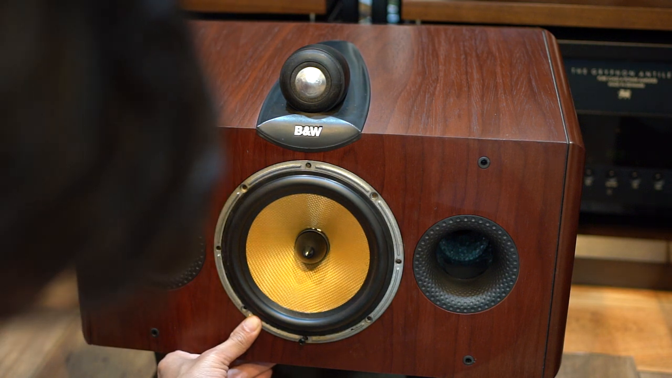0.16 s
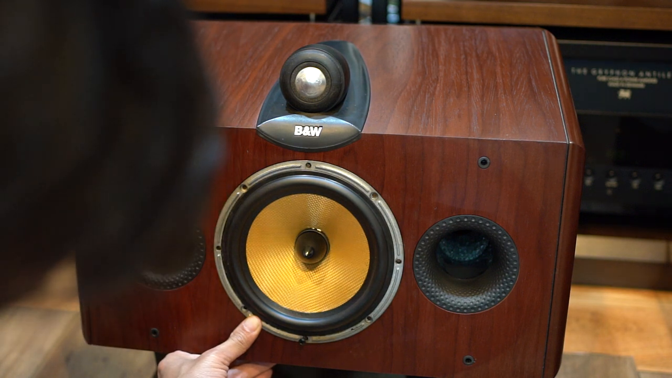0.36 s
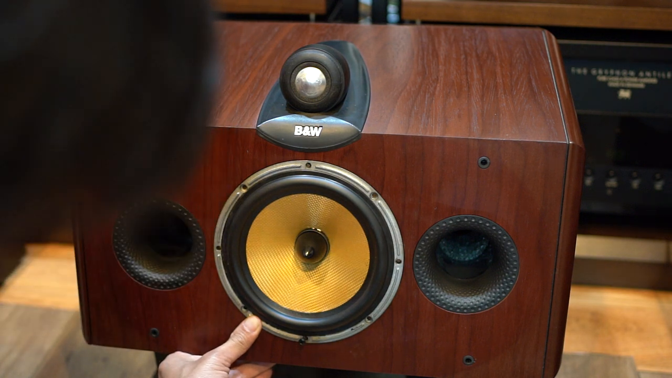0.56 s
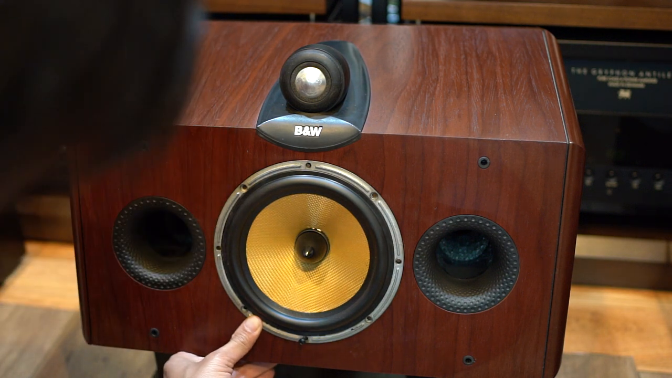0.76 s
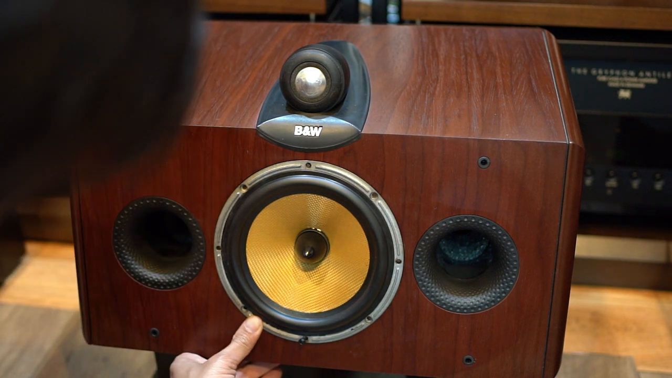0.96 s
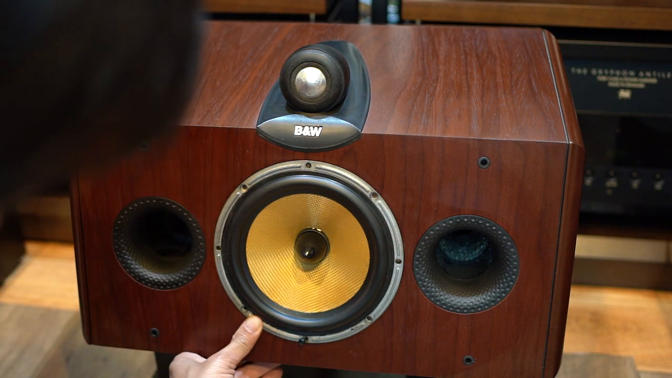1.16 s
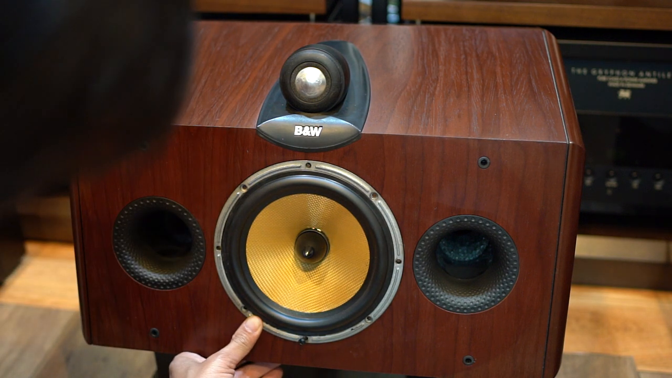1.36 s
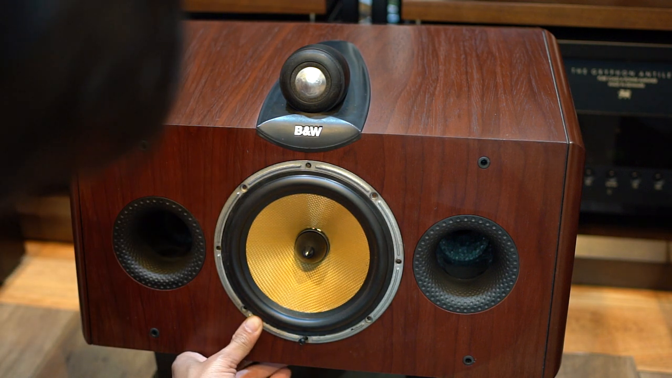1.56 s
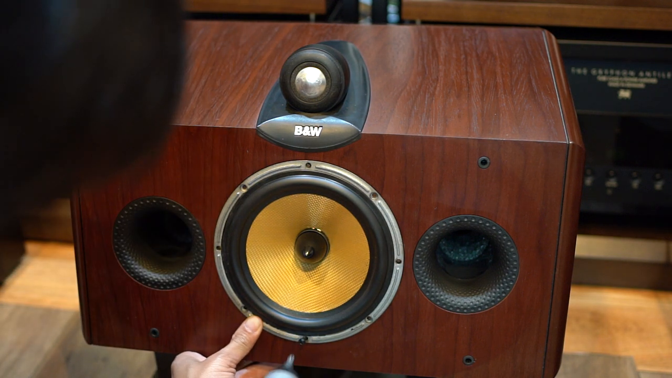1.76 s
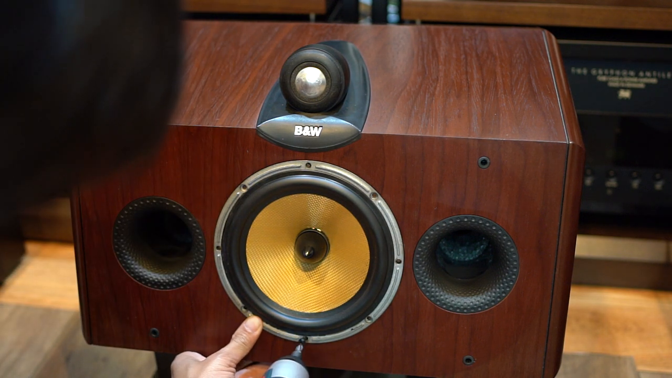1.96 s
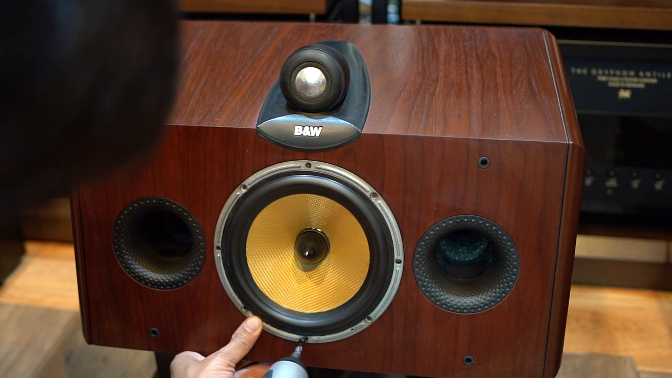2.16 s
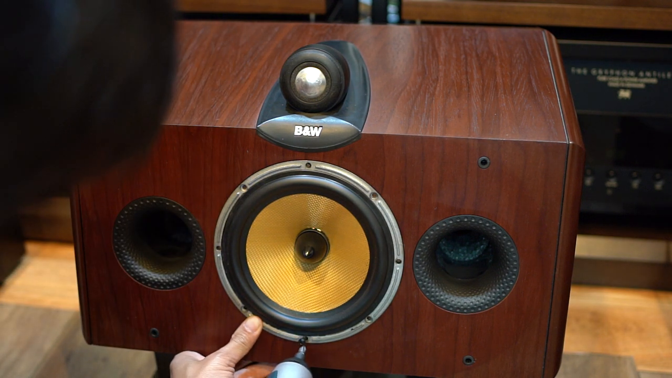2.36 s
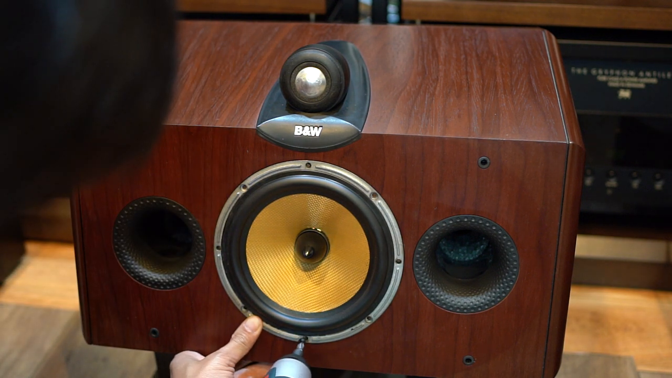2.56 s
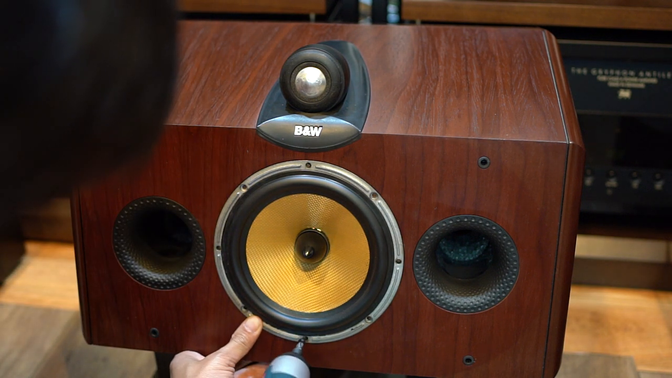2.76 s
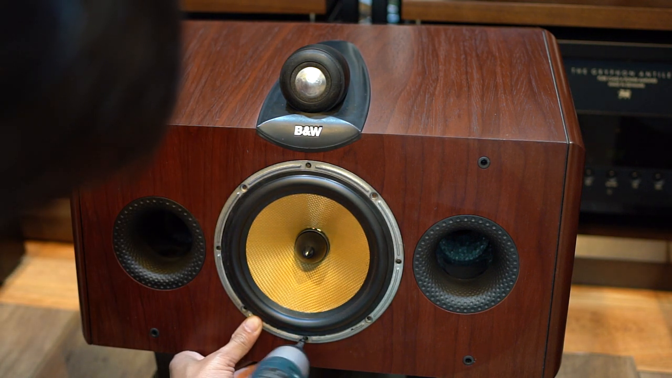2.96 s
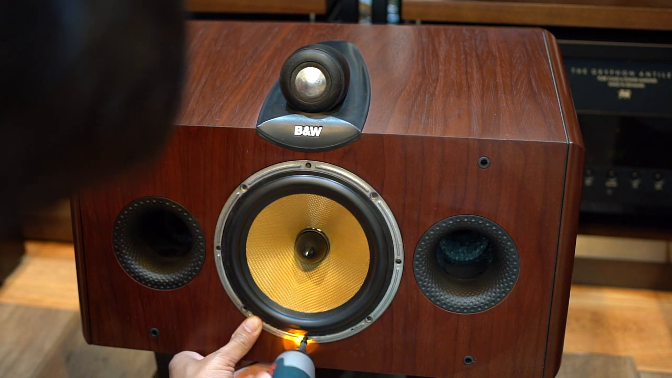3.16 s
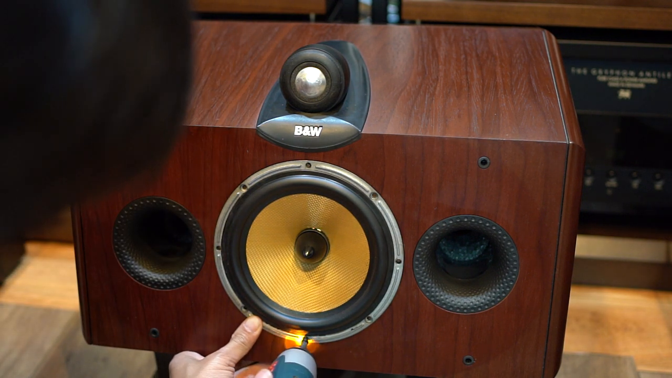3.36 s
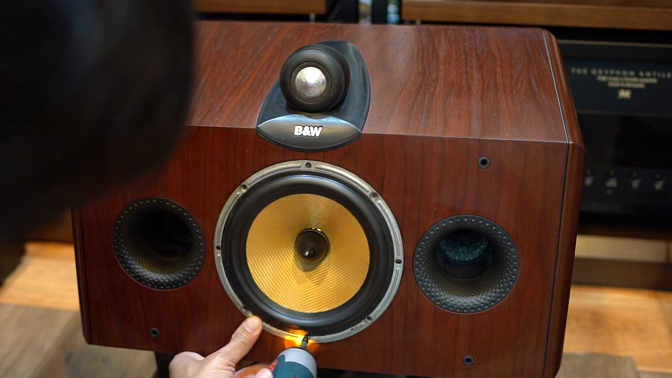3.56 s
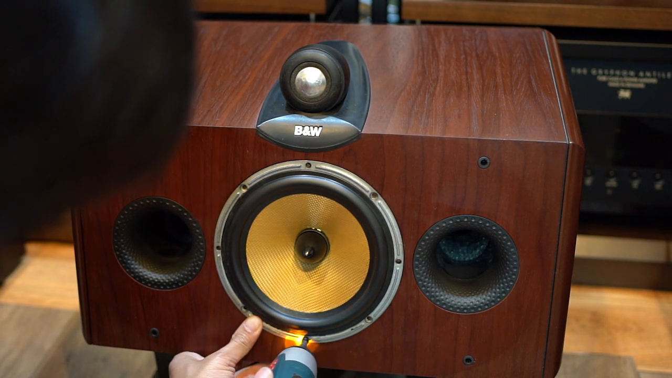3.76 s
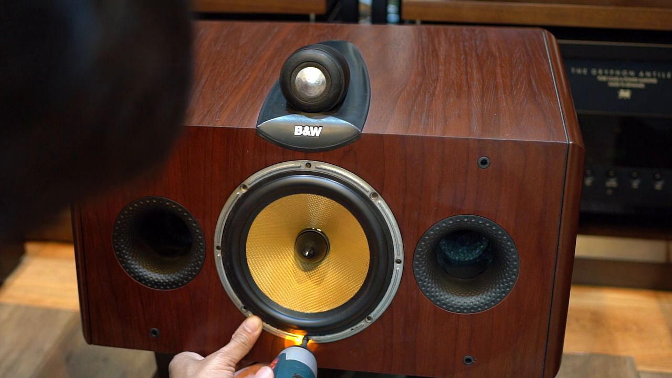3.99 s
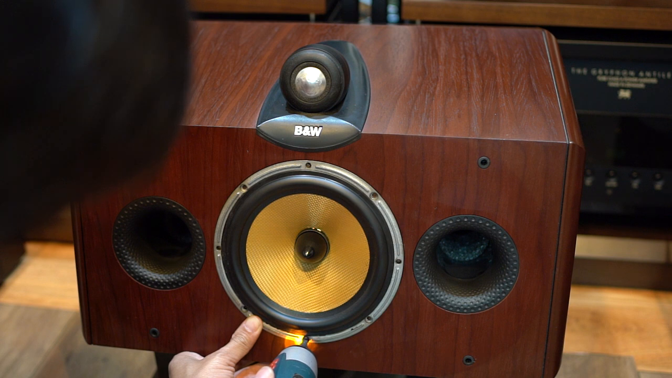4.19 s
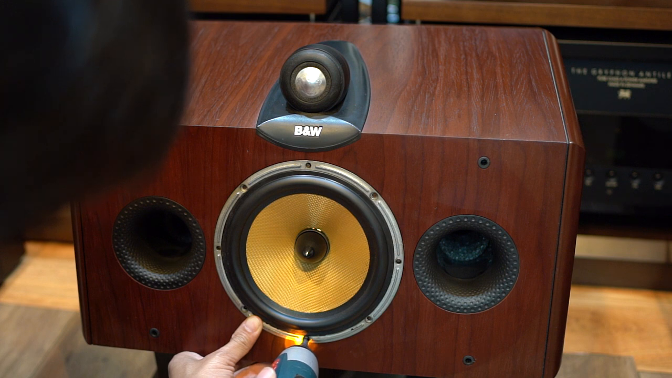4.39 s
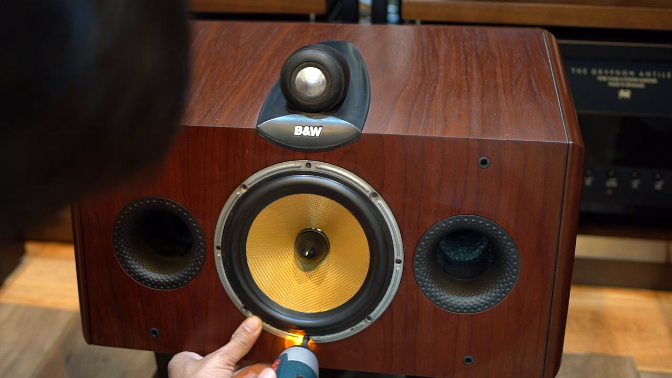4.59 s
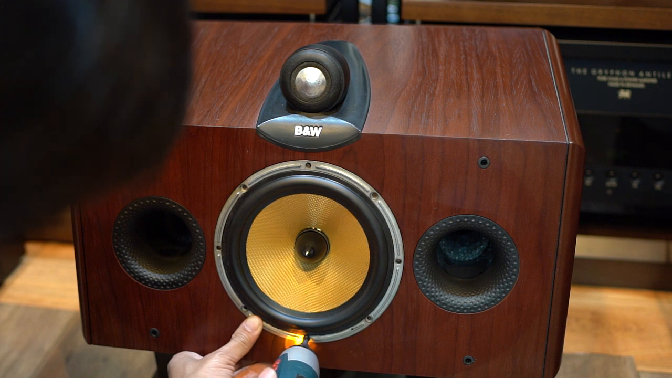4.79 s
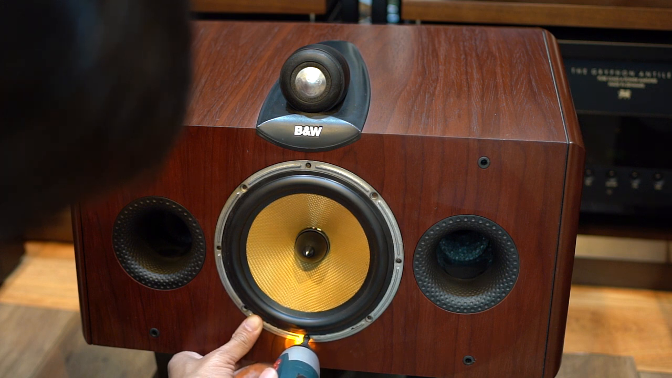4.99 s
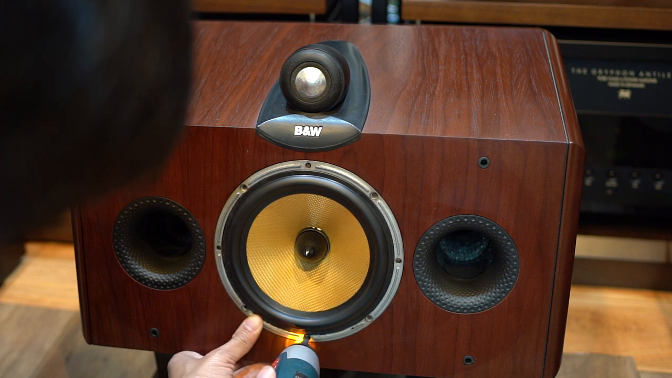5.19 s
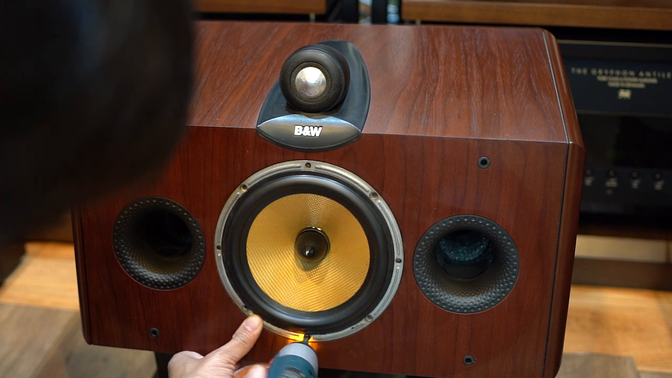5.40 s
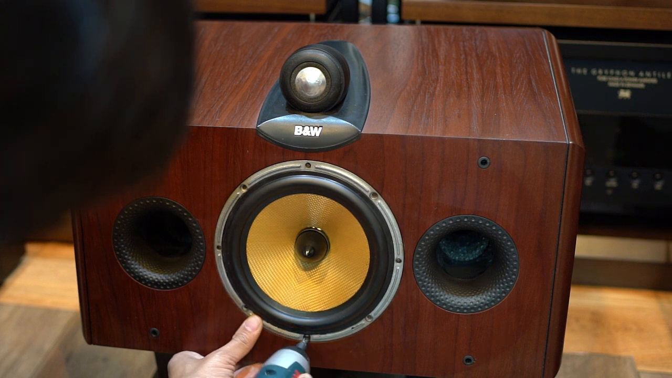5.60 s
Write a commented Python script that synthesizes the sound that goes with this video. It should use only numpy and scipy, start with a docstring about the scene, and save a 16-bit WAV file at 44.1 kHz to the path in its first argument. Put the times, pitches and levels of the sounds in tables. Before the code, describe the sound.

After faint handling clicks, a cordless screwdriver drives a screw into a wooden loudspeaker cabinet, sagging in pitch and squealing before it stops.

```python
"""Soft rustles, clicks of small parts and taps on wood sound in a quiet room; a bit ticks into a screw.
Then a cordless screwdriver spins up and drives the screw into a wooden loudspeaker cabinet. Its shaft
hums in harmonics and its planet gears sing and rattle, all at rates tied to the shaft speed. The motor
sags under the growing load until the gear teeth squeal and the trigger is let go."""
import sys
import numpy as np
from scipy import signal
from scipy.fft import rfft, irfft, next_fast_len
from scipy.io import wavfile
from scipy.ndimage import uniform_filter1d

SR = 44100
rng = np.random.default_rng(int(sys.argv[2]) if len(sys.argv) > 2 else 0)


def transcribe(signal):
    """Save signal, clipped to [-1, 1], as a 16-bit WAV file at the path in sys.argv[1]."""
    frames = np.atleast_2d(signal).T
    limited = np.clip(frames, -1, 1)
    pcm = np.round(limited * 32767).astype(np.int16)
    wavfile.write(sys.argv[1], SR, pcm)


N = 248724
T = np.arange(N) / SR
START_S, STOP_S = 3.16, 5.587  # the trigger is pressed and let go
PLANET_RATIO, MESH_RATIO = 16 / 27, 16 / 3  # planet turns and tooth contacts per shaft turn


def undb(db):
    """Decibels to amplitude ratio."""
    return 10 ** (np.asarray(db) / 20)


def unit(x):
    """Scale to rms 1."""
    return x / np.sqrt(np.mean(x ** 2))


def octaves(hz, pivot_hz):
    """Octaves above a pivot frequency, constant below 150 Hz."""
    return np.log2(np.maximum(hz, 150) / pivot_hz)


def shape(hz, points):
    """Spectral envelope in dB, interpolated over log frequency."""
    f, db = np.transpose(points)
    return np.interp(np.log(np.maximum(hz, 1)), np.log(f), db)


def bumps(hz, modes):
    """Resonance: each mode adds a bell-shaped peak in dB."""
    return sum(db / (1 + (2 * (hz - f) / width) ** 2) for f, width, db in modes)


def colour(x, db_at):
    """Minimum-phase filter whose gain in dB is a function of frequency."""
    n = 2 * next_fast_len(x.shape[-1] // 2 + 2048)
    cepstrum = irfft(np.log(undb(db_at(np.arange(n // 2 + 1) * SR / n))))
    cepstrum[1:n // 2] *= 2
    cepstrum[n // 2 + 1:] = 0
    return irfft(rfft(x, n) * np.exp(rfft(cepstrum)))[..., :x.shape[-1]]


def butter(order, hz, kind):
    """Butterworth filter sections."""
    return signal.butter(order, hz, kind, fs=SR, output="sos")


def walk(rate_hz):
    """Random modulation with a standard deviation near 1."""
    knots = rng.standard_normal(4096)
    return np.sqrt(3 / 2) * np.interp(T * rate_hz, np.arange(len(knots)), knots)


def fade(t, t60):
    """Damping: exponential decay, 60 dB down after t60."""
    return np.exp(-np.log(1000) * t / max(t60, 1e-3))


def swell(middle_s, half_length_s):
    """Gaussian envelope, 1 at the top."""
    return np.exp(-((T - middle_s) / half_length_s) ** 2)


def spread(mid, side):
    """Diffuse field: long waves reach both ears alike, short waves are unrelated."""
    # stereo width of the room: frequency_hz, side_minus_mid_db
    width = [(250, -10.5), (600, 0.5), (1500, 0.5), (8000, 1)]
    side = colour(side, lambda f: shape(f, width))
    return np.array([mid + side, mid - side])


def touch(start_s, peak_db, t60, db_at, rise_s=.0005):
    """Impact noise: a short burst of tiny collisions, filtered by what was struck."""
    t = T[:SR // 4]
    envelope = np.minimum(t / max(rise_s, 1e-4), 1) ** 2 * fade(t, t60)
    burst = colour(rng.standard_normal(len(t)) * envelope, db_at)
    peak = np.sqrt(uniform_filter1d(burst ** 2, size=128).max())
    return np.pad(burst * undb(peak_db) / peak, (int(start_s * SR), N))[:N]


def struck(blows, modes):
    """Free vibration: every blow excites the same damped modes."""
    out = 0
    for start_s, db in blows:
        t = np.maximum(T - start_s, 0)
        ring = sum(undb(gain_db) * np.sin(2 * np.pi * f * t) * fade(t, t60) for f, gain_db, t60 in modes)
        out = out + undb(db) * ring
    return out


def air(level_db=-58.5):
    """Ambient noise: the low murmur of the building under a thin hiss."""
    # spectrum of the quiet room: frequency_hz, level_db
    murmur = [(15, -57), (25, -18), (59, -10.5), (108, -4), (180, -11.5), (242, -5), (309, -11.5),
              (373, -5), (405, -12.5), (439, -12), (545, -13.5), (591, -12.5), (754, -17.5), (11000, -27.5),
              (16000, -31)]
    noise = colour(spread(*rng.standard_normal((2, N))), lambda f: shape(f, murmur))
    return unit(noise) * undb(level_db + .5 * walk(2.8))


def room(x, t60=0.22, early_t60=0.0055, early_gain=0.78, wet_db=-6):
    """Reverberation: quick reflections from cabinet and floor, then a furnished room's short tail."""
    t = T[:SR // 3]
    envelope = (fade(t, t60) + early_gain * fade(t, early_t60)) * (t > .0005)
    echoes = rng.standard_normal((2, len(t))) * envelope / np.sqrt(np.sum(envelope ** 2))
    echoes = colour(spread(*echoes), lambda f: shape(f, [(850, -9), (1800, -2.5), (8000, -0.45)]))
    return x + undb(wet_db) * signal.fftconvolve(x, echoes, axes=1)[:, :N]


def rustles(flicker_db=2):
    """Friction noise: soft rustles, and a short rising scrape just before a click."""
    # swells of rustle and scrape: middle_s, half_length_s, level_db
    swells = [(.08, 0.14, -63), (0.26, 0.028, -60.5), (0.283, .008, -50), (0.535, 0.066, -60.5),
              (0.694, 0.064, -61), (0.856, 0.1, -58), (1.242, 0.28, -66), (1.636, 0.064, -64.5)]
    # spectrum of the friction: frequency_hz, level_db
    spectrum = [(200, -2), (1000, 7), (2000, 2.5), (4000, -3), (8000, -4), (16000, -12.5)]
    envelope = sum(undb(db) * swell(s, half_length) for s, half_length, db in swells)
    friction = unit(colour(rng.standard_normal(N), lambda f: shape(f, spectrum)))
    return friction * envelope * undb(flicker_db * walk(23.5))


def taps(t60=0.042, rise_s=0.0017):
    """Damped impacts: fingers and tool tap on the wood, some dull and some bright."""
    # taps on the wood: start_s, peak_db, tilt_db_per_octave
    contacts = [(.098, -47.5, 0.5), (.1786, -56, 5.5), (0.2898, -33.5, 2), (0.7127, -46.5, -1.5),
                (0.7915, -42.5, -2.5), (0.8098, -39.5, -1.5), (.8176, -39.5, -1.5), (.8255, -42.5, 0),
                (1.353, -55, 1), (1.4096, -57, 8), (1.563, -51, 6), (1.6643, -56.5, 0), (2.635, -55.5, 2),
                (2.665, -54, -2), (2.8487, -35.5, 5)]
    # spectrum of tapped wood: frequency_hz, level_db
    wood = [(100, -18), (170, -16), (280, -16), (400, -15), (620, -8.5), (850, -10.5), (1900, -10),
            (4400, -24), (14000, -51)]
    return sum(touch(s, db, t60, lambda f: shape(f, wood) + tilt * octaves(f, 1500), rise_s)
               for s, db, tilt in contacts)


def thumps():
    """Panel resonance: a push rings the low modes of the cabinet, which radiates little deep bass."""
    # pushes on the baffle: start_s, level_db
    pushes = [(0.8097, -45), (0.827, -40), (2.8509, -37.5), (2.878, -46)]
    # cabinet modes: pitch_hz, level_db, t60_s
    cabinet = [(208, -3.5, 0.14), (256, -7, 0.15), (292, -0.5, 0.062), (656, -14, 0.067)]
    return signal.sosfilt(butter(3, 180, "high"), struck(pushes, cabinet))


def steel(hz, tilt_db, low_hz, cut_db_per_octave=9):
    """Radiation from steel on steel, in dB: the lighter the part, the less bass it gives."""
    # spectrum of the contact: frequency_hz, level_db
    contact = [(150, -15), (550, -5.5), (1100, -7), (1900, -1.5), (3200, 1), (4400, -2.5), (6000, -3.5),
               (9000, -9), (13000, -12), (15000, -15), (16000, -18)]
    # resonances of small steel parts: pitch_hz, width_hz, gain_db
    modes = [(3130, 110, 8), (3500, 130, -1), (5440, 680, 1), (6100, 95, 2), (7500, 270, 5), (8500, 850, 1)]
    bass_db = cut_db_per_octave * np.minimum(octaves(hz, low_hz), 0)
    return shape(hz, contact) + bumps(hz, modes) + tilt_db * octaves(hz, 4000) + bass_db


def ticks(t60=0.057):
    """Light impacts: the tip of the bit skips over the screw head, feeling for the slot."""
    # skips of the bit: start_s, peak_db
    skips = [(2.7534, -44.5), (2.9892, -55), (3.0132, -48.5), (3.038, -46.5), (3.058, -48.5), (3.084, -50),
             (3.126, -49)]
    return sum(touch(s, db, t60, lambda f: steel(f, tilt_db=-4.5, low_hz=1500)) for s, db in skips)


def pings():
    """Modal ringing: the bit vibrates freely after it meets the screw head."""
    # blows on the bit: start_s, level_db
    blows = [(2.7527, -44), (2.765, -45)]
    # modes of the bit: pitch_hz, level_db, t60_s
    modes = [(874, -13, 0.25), (3140, -3.5, 0.15), (3600, -1, 0.056)]
    return struck(blows, modes)


def clicks(t60=0.037, rebound_s=0.011, rebound_db=-9, ring_db=6, ring_width_share=0.067):
    """Impact and rebound: small steel parts click, and the trigger clicks as the motor starts."""
    # sharp clicks: start_s, peak_db, tilt_db_per_octave, ring_hz, rise_s
    events = [(0.103, -47, -2.5, 3000, 0.0044), (0.2888, -32, 5.5, 6000, .0003),
              (1.0588, -28, 0.9, 5200, 0.0036), (2.764, -40.5, -0.5, 12600, 0.0014),
              (3.165, -42, -6.5, 2700, 0.0095)]
    out = 0
    for s, db, tilt, ring_hz, rise_s in events:
        resonance = [(ring_hz, ring_width_share * ring_hz, ring_db)]
        tone = lambda f: steel(f, tilt, low_hz=603) + bumps(f, resonance)
        out = out + touch(s, db, t60, tone, rise_s)
        out = out + touch(s + rebound_s, db + rebound_db, t60, tone, rise_s)
    return out


def motor(free_hz=236.2, kick_share=.27, spin_up_s=.072, coast_s=.11):
    """Inertia and load: the shaft speed in Hz, and the share of free speed that the screw takes away."""
    # speed that the screw's resistance allows: time_s, shaft_hz
    speed = [(4.1, 234.1), (4.4, 232.1), (4.65, 228.9), (4.88, 221.1), (5.05, 218.5), (5.3, 206.7),
             (5.4, 188.2), (5.44, 168.4), (5.47, 161.2), (5.5, 140.3), (5.585, 119)]
    loaded_hz = np.interp(T, *np.transpose(speed))
    spin_up = 1 - (1 - kick_share) * np.exp(-np.maximum(T - START_S, 0) / spin_up_s)
    coast = np.exp(-np.maximum(T - STOP_S, 0) / coast_s)
    return loaded_hz * spin_up * coast, np.maximum(1 - loaded_hz / free_hz, 0)


def trigger(attack_s=0.081, attack_db=12.5, release_db_per_s=228):
    """Amplitude envelope: the running noise swells, holds and dies away exponentially."""
    attack = np.clip((T - START_S) / attack_s, 0, 1)
    return (T > START_S) * undb(attack_db * (attack - 1) - release_db_per_s * np.maximum(T - STOP_S, 0))


def groan(planet_turns, load, level_db=-56, flutter_db=3):
    """Forced vibration: the pressed bit shakes the cabinet once a planet turn."""
    return load * undb(level_db + flutter_db * walk(30)) * np.sin(2 * np.pi * planet_turns + .5 * walk(40))


def hum(hz, turns, load, flutter_db=1.25, idle_db_per_decade=45, idle_hz=233, stall_hz=165, full_hz=205):
    """Shaft harmonics: they grow with speed, excite the housing under load and fade near the stall."""
    # motor hum: shaft_harmonic, level_db
    harmonics = [(1, -54.5), (2, -61.5), (3, -43), (4, -59.5), (5, -55.5), (6, -50.5), (7, -42.5), (8, -46)]
    # housing resonances: pitch_hz, width_hz, gain_db
    housing = [(203, 21, 14.5), (621.5, 12, 6.5), (884, 94, 23.5)]
    pressed = np.clip(2 * load, 0, 1)
    speed_db = idle_db_per_decade * np.log10(hz / idle_hz) * (1 - pressed)
    tones = 0
    for k, db in harmonics:
        gain_db = db + speed_db + pressed * bumps(k * hz, housing) + flutter_db * walk(17)
        tones = tones + undb(gain_db) * np.sin(2 * np.pi * (round(k) * turns + rng.random()))
    return np.sqrt(2) * tones * np.clip((hz - stall_hz) / (full_hz - stall_hz), 0, 1)


def gear_song(hz, turns, flutter_db=3, backlash_turns=0.008):
    """Periodic excitation: uneven teeth repeat each planet turn, giving harmonics blurred by backlash."""
    # envelope of the gear harmonics: frequency_hz, level_db
    spectrum = [(70, -30), (110, -82), (130, -24.5), (280, -14.5), (550, -16), (950, -13.5), (1250, 0),
                (1500, 0), (1850, 4.5), (2450, 0), (3300, -4), (5000, -10.5), (8000, -15.5)]
    turns = turns + backlash_turns * walk(45)
    lines = 0
    for k in range(1, 56):
        db = shape(k * hz, spectrum) + flutter_db * walk(12)
        lines = lines + undb(db) * np.sin(2 * np.pi * (k * turns + rng.random()))
    return unit(lines)


def rattle(turns, load, rub, top_db, ring_db, knock_db=8.5, knock_turns=0.17, scatter_db=1.7,
           grain_db=0.8, wood_db=5.0, side_db=-8, rub_db_per_octave=3.2):
    """Modulated noise: loose gears knock once a planet turn as they grind; under load the wood joins in."""
    # spectrum of the grinding: frequency_hz, level_db
    spectrum = [(50, -58), (190, -18), (450, -19.5), (680, -11.5), (1020, -11), (1300, -4), (1800, 0),
                (2600, -0.5), (3500, -2), (4200, -5.5), (6200, -4), (9500, -9.5), (13000, -13.5),
                (16000, -19)]
    # resonances of chuck and bit: pitch_hz, width_hz, gain_db
    chuck = [(4790, 440, 7), (7130, 380, 7.5), (8280, 600, 4.5), (10880, 550, 2.5)]
    strengths = undb(knock_db + scatter_db * np.clip(rng.standard_normal(4096), -2, 2))
    knocks = strengths[turns.astype(int)] * np.exp(-(turns % 1) / knock_turns)
    # the gearbox radiates from all round its case, so each ear gets its own share
    mid, side = rng.standard_normal((2, N))
    grit = spread(mid, undb(side_db) * side) * np.sqrt(1 + knocks ** 2) * undb(grain_db * walk(650))
    metal = unit(colour(grit, lambda f: shape(f, spectrum) + bumps(f, chuck)))
    wood = signal.sosfiltfilt(butter(2, 1700, "low"), metal)
    top = signal.sosfiltfilt(butter(2, 8500, "high"), metal)
    rings = 0
    for f, width, _ in chuck:
        mode = signal.lfilter(*signal.iirpeak(f, f / width / 2, fs=SR), metal)
        # the chuck rings harder each time it rubs, its high modes most
        rings = rings + mode * (undb(ring_db + rub_db_per_octave * rub * octaves(f, 4300)) - 1)
    return metal + rings + wood * (undb(wood_db * load) - 1) + top * (undb(top_db) - 1)


def squeal(hz, turns, flutter_db=3, labour_shaft_hz=158, soft_db=-7, creak_db=-5):
    """Forced resonance: loaded teeth ring the gear case; as the motor labours they judder and creak."""
    # squeal partials: mesh_harmonic, level_db
    partials = [(1, -9.5), (2, 0), (3, -7), (4, -11.5), (5, -4), (6, -13), (7, -22)]
    # gear case resonances: pitch_hz, width_hz, gain_db
    gear_case = [(1264, 160, 7.5), (1740, 250, 6), (2147, 330, 14), (3010, 250, 11.5), (3732, 290, 7.5)]
    labour = np.clip((labour_shaft_hz * MESH_RATIO / hz - 1) * 10 + 1, 0, 1)
    turns = turns + (.015 + .05 * labour) * walk(170) + .022 * labour * walk(600)  # judder
    tones = 0
    for k, db in partials:
        gain_db = db + flutter_db * walk(110) + soft_db * (1 - labour) * (k > 2)
        tones = tones + undb(gain_db) * np.sin(2 * np.pi * (round(k) * turns + rng.random()))
    scrape = rng.standard_normal(N) * np.exp(-4 * (turns % 1))
    creak = unit(signal.sosfilt(butter(2, [1000, 3800], "band"), scrape))
    return colour(tones + creak * labour * undb(creak_db), lambda f: bumps(f, gear_case))


def screwdriver(gear_ratio=81, full_load_sag=0.13, rub_s=4.35, seat_s=5.445,
                squeal_s=5.335, squeal_attack_s=0.085, squeal_release_s=0.035, squeal_db=-27.5):
    """Coupled rotation: one shaft sets every rate, and the gears grow louder as the screw goes in."""
    hz, sag = motor()
    load = np.tanh(sag / full_load_sag)
    turns = np.cumsum(hz * (1 + 0.00196 * walk(30))) / SR
    planet_turns = PLANET_RATIO * turns
    screw_turns = (turns - np.interp(START_S, T, turns)) / gear_ratio
    # the off-centre chuck rubs once a screw turn, with one peak at rub_s
    rub = np.cos(2 * np.pi * (screw_turns - np.interp(rub_s, T, screw_turns)))
    seating = swell(seat_s, half_length_s=0.035)  # the screw head scrapes on the metal frame
    tight = np.clip((T - squeal_s) / squeal_attack_s, 0, 1)
    song_db = -38 + 1.07 * screw_turns + 6.5 * load - 5.5 * tight  # the song gives way to the squeal
    rattle_db = -32.5 + 0.86 * screw_turns + 0.17 * rub + 4 * seating
    top_db = 0.5 + 6.5 * load - 20 * sag + 4 * seating  # pressure brightens the rattle, slowing dulls it
    ring_db = -3 + 0.44 * screw_turns  # the chuck rings more freely the deeper the screw is
    release = np.exp(-np.maximum(T - STOP_S, 0) / squeal_release_s)
    song = gear_song(PLANET_RATIO * hz, planet_turns) * undb(song_db)
    grinding = rattle(planet_turns, load, rub, top_db, ring_db) * undb(rattle_db)
    teeth = squeal(MESH_RATIO * hz, MESH_RATIO * turns) * undb(squeal_db) * tight * release
    return trigger() * (hum(hz, turns, load) + groan(planet_turns, load) + song + grinding + teeth)


def scene():
    """Superposition: handling and tool add in the room; a level difference sets them a little right."""
    # level difference between the ears: frequency_hz, left_minus_right_db
    lean = [(700, 0), (1400, -1.2), (4000, -1.1), (8000, -3), (15000, -1.7)]
    sources = screwdriver() + clicks() + ticks() + taps() + thumps() + pings() + rustles()
    # things this small give off no deep bass
    left, right = room(signal.sosfilt(butter(4, 105, "high"), sources))
    left = colour(left, lambda f: shape(f, lean) / 2)
    right = colour(right, lambda f: -shape(f, lean) / 2)
    return np.array([left, right]) + air()


def record(dry, top_hz=15950):
    """Band limiting: a steep low-pass filter removes the highest treble."""
    return signal.sosfilt(signal.ellip(10, .2, 80, top_hz, fs=SR, output="sos"), dry)


dry = scene()
out = record(dry)
transcribe(out)
```